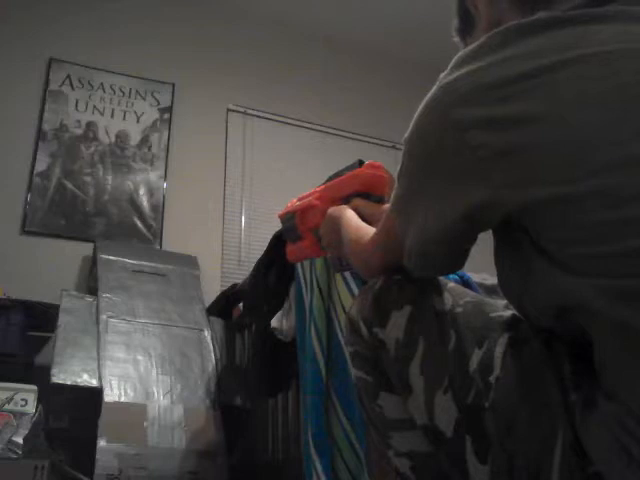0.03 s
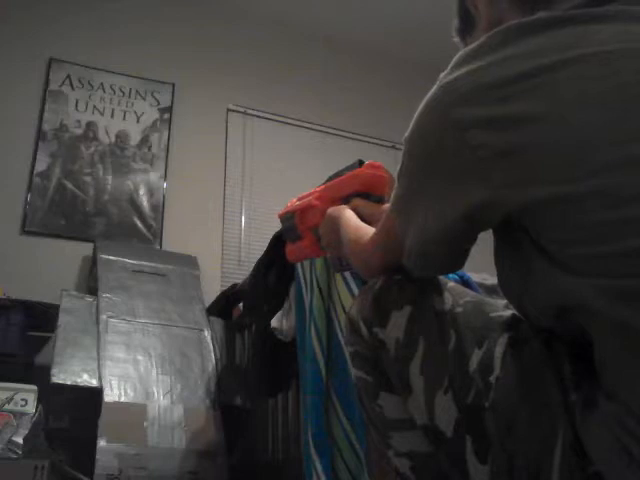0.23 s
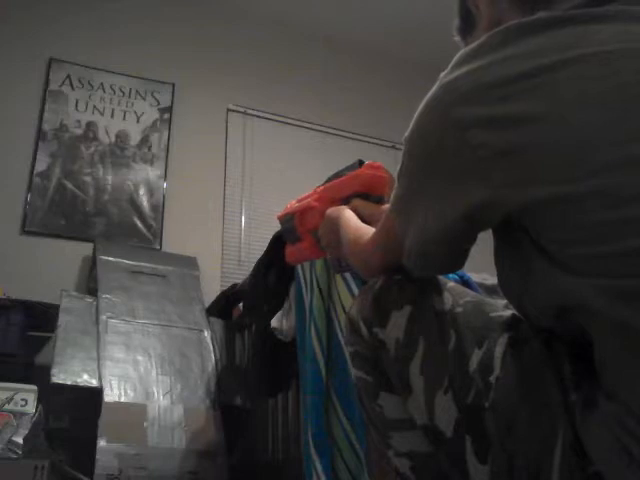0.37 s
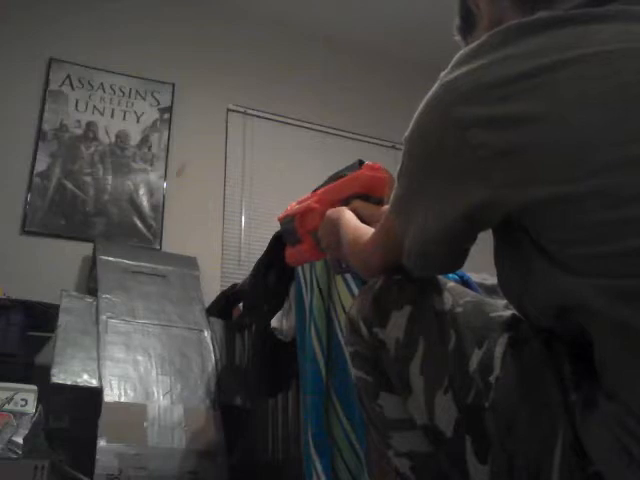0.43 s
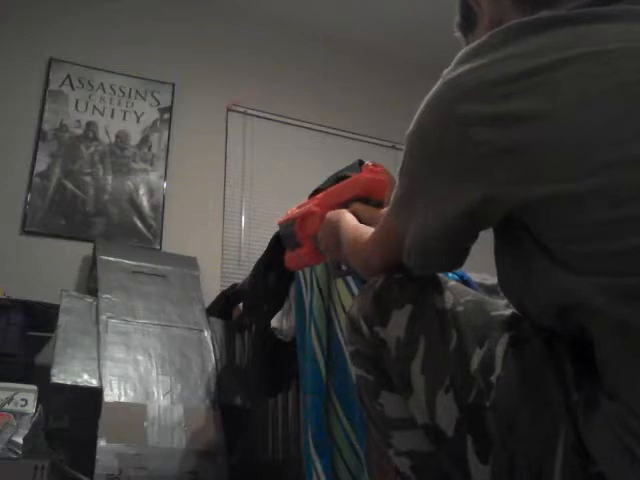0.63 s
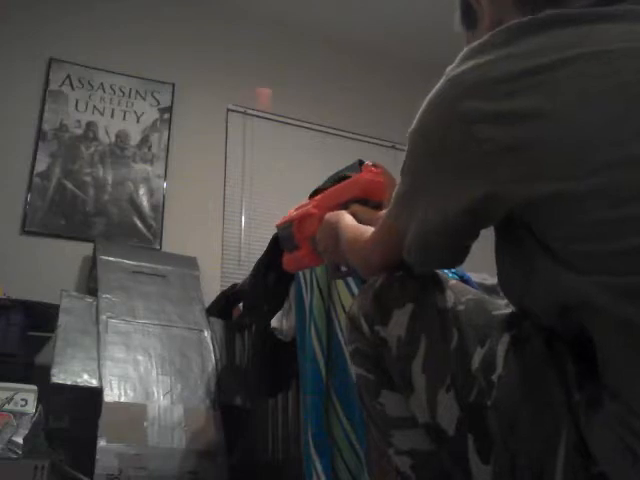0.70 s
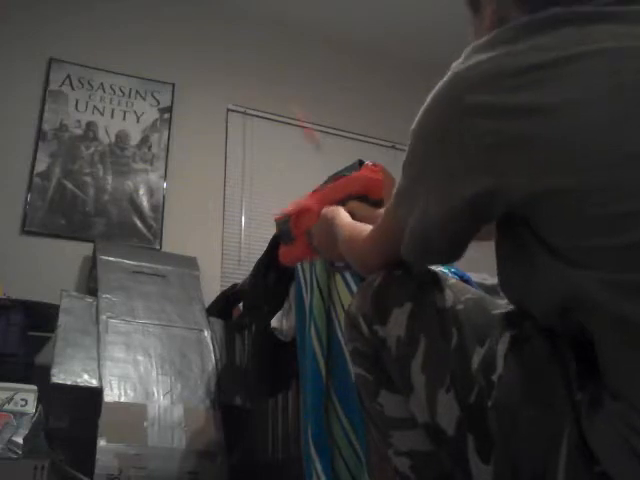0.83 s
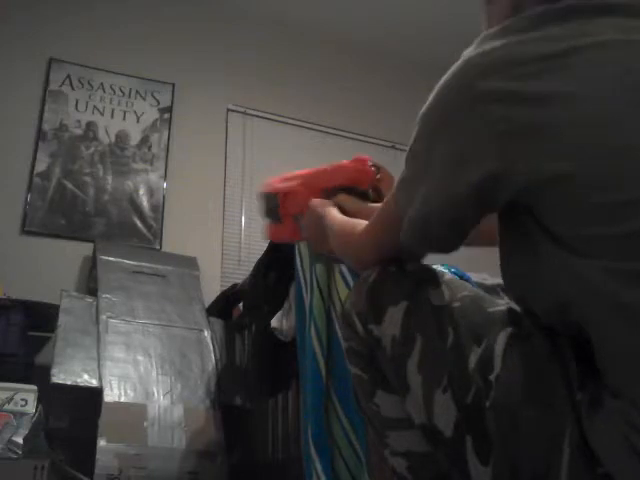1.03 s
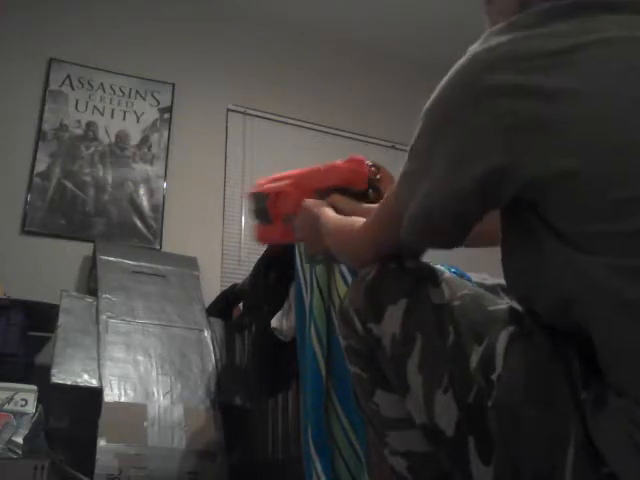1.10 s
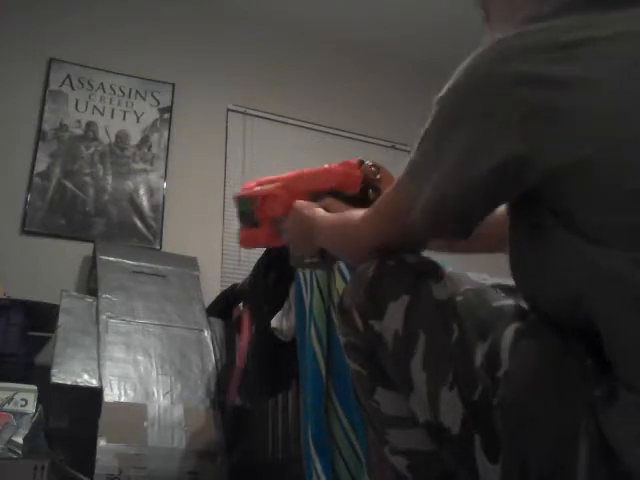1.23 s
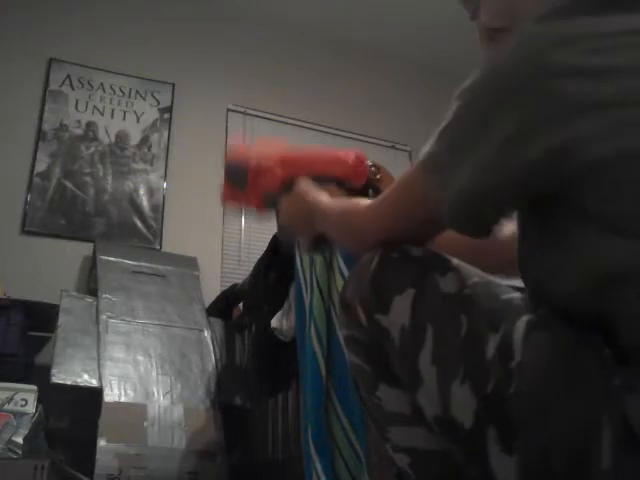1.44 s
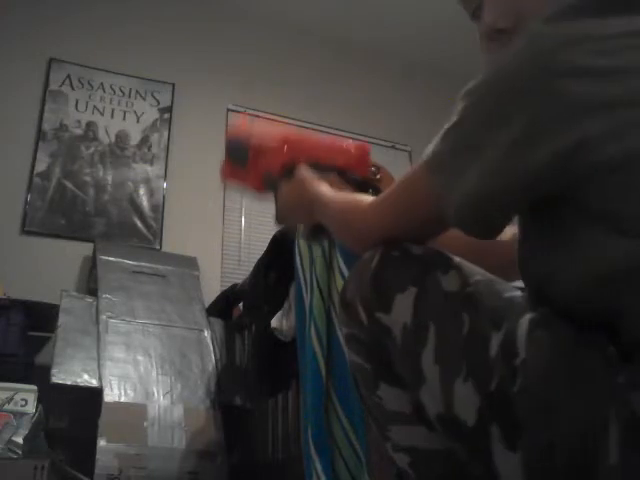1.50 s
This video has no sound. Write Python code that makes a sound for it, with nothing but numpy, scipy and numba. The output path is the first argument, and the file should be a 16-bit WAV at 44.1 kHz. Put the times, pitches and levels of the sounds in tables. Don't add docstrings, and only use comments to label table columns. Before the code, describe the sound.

Toy dart gun shot: small plastic creaks, one hard clipped snap, short room tail, soft knocks after.

```python
import sys
import numpy as np
from scipy import signal
from scipy.fft import rfft, irfft, next_fast_len
from scipy.io import wavfile
from scipy.ndimage import uniform_filter1d
from numba import njit

SR = 44100
rng = np.random.default_rng(int(sys.argv[2]) if len(sys.argv) > 2 else 0)


def transcribe(u):
    v = np.clip(np.atleast_2d(u).T, -1, 1)
    q = np.round(v * 32767).astype(np.int16)
    wavfile.write(sys.argv[1], SR, q)


def volts(x):
    e = np.asarray(x, float) / 20
    return 10 ** e


N = 68355
TAIL = 24000
NEAR_DECAY = 0.63

# [f/Hz, level/dB]
HISS = [(30, -46.5), (135, -21), (210, -6), (674, -18.5), (728, -18.5), (3190, -28), (14800, -27.5),
        (16000, -69)]
# [t/s, level/dB, contact/ms, tilt/(dB/octave), room/dB]
HANDLING = [(.0293, -51.5, 5.9, 1.5, -4.5), (.04, -52, 6.2, -4.5, -13), (.047, -41.5, 4.66, 1, -13.5),
            (.051, -36.5, 4, -2, -12.5), (.069, -35, 5, -2.5, -12), (.0892, -31, 8.1, -1, -7),
            (.104, -53, 4, -13, -12), (.116, -39, 5, 1, -9), (.13, -41, 4, -1.5, -10),
            (.193, -26.5, 6, -3.5, 0), (.755, -62.5, 2.66, -6.5, 4.5), (.856, -54, 2, -4, -25),
            (.861, -45.5, 6.3, 0, -0.5), (.8688, -31, 5.6, -0.5, -15.5), (.8755, -37.5, 7.7, -2, -13),
            (.884, -33, 4.9, -4, -22), (.891, -39, 5.8, 5.5, -16), (.897, -31, 2.5, -5, -15),
            (.906, -36.5, 2.1, -2, -14.5), (.911, -49, 6.6, 1.5, -15.5), (.922, -51, 2.65, -2, -23),
            (1.03, -66, 4, -10, -32.5), (1.278, -55.5, 7.8, 1, -8), (1.295, -58, 5.3, -5, -8),
            (1.343, -54.5, 8.7, -3, -0.5), (1.3608, -45.5, 2.3, -0.5, -11), (1.373, -50, 3, 5.5, -25),
            (1.377, -52, 2, -10, -8), (1.384, -49, 4.4, 5, -10), (1.3957, -55, 4.5, -2, -10),
            (1.411, -54.5, 4.5, 2, -7), (1.426, -59.5, 3, 5, -12), (1.483, -49.5, 4.8, -4, -13)]
# [t/s, level/dB, contact/ms, tilt/(dB/octave), room/dB]
SHOT_HITS = [(.2005, -9, 3, 2, -12.5), (.2035, -1.5, 3.6, 0.5, -9), (.2075, -6, 3, 0, -16),
             (.2106, 6, 7, -1, -17.5), (.2165, 7.5, 3.8, -4, -19.5), (.236, -8, 5, 0, -8),
             (.246, -9, 3, 1, -10), (.257, -4.5, 9, -0.5, -7), (.266, -5.5, 2, -1.5, -13.5),
             (.273, -11, 4, -1, -14), (.284, -7.5, 5.6, 1, -8), (.298, -6.5, 4, -3.5, -7),
             (.319, -5.5, 5.3, -1, -6.5), (.334, -8.5, 6, 0, -8.5)]
# [f/Hz, level/dB]
PLASTIC_COLOUR = [(88, -60), (150, -30), (443, -12), (711, -12.5), (1610, -7.5), (2790, -9), (4160, -7.5),
                  (8070, -25.5), (14000, -62)]
# [f/Hz, level/dB]
BODY_COLOUR = [(180, -26), (650, -17), (960, -8), (2100, -13.5), (3400, -4), (4400, -2.5), (6300, -21),
               (13000, -49)]
# [t/s, level/dB, contact/ms, room/dB]
DART_HITS = [
    (.2876, 7, 2.2, -10.5),
    (.2945, 2, 0.74, -7),
    (.2995, 2, 0.92, -5),
    (.3115, 3, 1.64, -14),
    (.319, 6, 0.37, -10),
    (.3245, 5, 0.68, -12),
    (.3285, 6.5, 1.04, -9),
    (.3375, -1.5, 0.51, -10),
    (.3445, 7, 0.8, -9),
    (.36, -0.5, 0.9, -7.5),
]
# [f/Hz, level/dB, t60/s]
BOX_MODES = [(124.4, -6.5, 0.063), (223.3, -12.5, 0.024), (290, -4.5, 0.049), (426, 4.5, 0.034),
             (528.5, 11.5, 0.014), (644, -4, 0.019), (762, 2, 0.02), (904, 0, 0.0067), (1297, -8, 0.03),
             (1550, -8, 0.031)]
# [t/s, level/dB, contact/ms, room/dB]
FRAME_KNOCKS = [
    (1.3612, -13.5, 1.26, -20.5),
    (1.3708, -14, 0.97, -24),
    (1.3794, -24, 1.216, -28),
    (1.3887, -22.5, 0.66, -27.5),
    (1.4037, -20.5, 0.71, -20.5),
    (1.4228, -28, 0.91, -33),
    (1.442, -33.5, 1, -12),
]
# [f/Hz, level/dB, t60/s]
FRAME_MODES = [(170, -27.5, 0.044), (231, -12, 0.056), (274, 4, 0.057), (323.5, 6.5, 0.04),
               (390.6, -7, 0.025), (606, -16, 0.057), (846, -13.5, 0.025)]
# [f/Hz, level/dB, t60/s]
RING_MODES = [
    (1284, -40.5, 1.7),
    (1263, -45, 1.5),
    (926, -6, 0.18),
    (987, -7, 0.13),
]
# [f/Hz, level/dB, t60/s, room/dB]
TINK_MODES = [(1890, -38.5, 0.032, -30), (2700, -42.5, .015, -19), (690, -33, .04, -7.5),
              (5050, -34, 0.025, -14), (847, -10, .06, -6), (1800, -49, 0.039, -7.5),
              (1243, -49.5, 0.084, -16.5), (4340, -21, 0.01, -30), (1276, -30.5, 0.027, -7),
              (1900, -26.5, 0.021, -5), (1650, -40.5, 0.014, -11.5), (2253, -39.5, 0.0181, -10.5),
              (1110, -62, 0.0094, -12), (1068, -23.5, 0.0073, -8), (2134, -39, 0.016, -19),
              (2360, -42, 0.019, -7), (4200, -38, 0.016, -13), (2254, -46, .015, -12),
              (2293, -48, .015, -3), (284, -16.5, .04, -14), (3240, -5, 0.033, -11.5),
              (912, -19.5, 0.013, -8.5), (3300, -27.5, .012, -21.5), (3750, -42, 0.011, -21.5),
              (415, -13, 0.21, -30.5), (960, -5, .04, -12.5), (980, -4, .06, -16), (3400, -34, 0.032, -12),
              (1280, -36, .02, -13.5), (4880, -19.5, 0.019, -5.5), (8300, -13, .025, -30),
              (2200, -8, .03, -12), (760, -35, .04, -10)]
TINK_TIMES = (.0505, .051, .0905, .0905, .236, .769, .775, .8697, .8697, .897, .911, 1.3605, 1.3605, 1.374,
              1.376, 1.389, 1.396, 1.4, 1.41, .2108, .213, .533, .0905, 1.3608, .345, .244, .256, .891, .88,
              .5325, .213, .204, .103)
# [t/s, level/dB, contact/ms, tilt/(dB/octave), room/dB]
FLOOR_BOUNCES = [
    (.5318, -17.5, 5.1, 0, -10),
    (.545, -24, 6.3, -1, -17),
    (.557, -26, 4.7, -2, -17),
    (.574, -34.5, 4, 0.5, -15),
    (.615, -33, 4, -0.5, -11),
    (.7677, -42, 4, 0, -10),
]
# [f/Hz, level/dB]
TIP_COLOUR = [(150, -49), (300, -18), (800, -11.5), (1600, -8), (2800, -8.5), (4400, -2.5), (6000, -13.5),
              (8500, -26.5), (14000, -45.5)]


def unit(x):
    return x / np.sqrt(np.mean(x ** 2))


def filtered(x, order, hz, kind="low"):
    return signal.sosfilt(signal.butter(order, hz, kind, fs=SR, output="sos"), x)


def colour(x, table, tilt_db=0.):
    size = next_fast_len(len(x) + 4096)
    log_hz = np.log(np.maximum(np.arange(size // 2 + 1) * SR / size, 10))
    hz, level_db = np.array(table, float).T
    db = np.interp(log_hz, np.log(hz), level_db) + tilt_db * (log_hz - np.log(2000)) / np.log(2)
    cepstrum = irfft(db * np.log(10) / 20, size)
    cepstrum[1:size // 2] *= 2
    cepstrum[size // 2 + 1:] = 0
    response = np.exp(rfft(cepstrum))
    response = unit(np.abs(response)) * np.exp(1j * np.angle(response))
    return irfft(rfft(x, size) * response, size)[:len(x)]


def modes(table, t):
    return sum(volts(db) * np.sin(2 * np.pi * hz * t) * volts(-60 * t / t60) for hz, db, t60 in table)


def add(out, x, s):
    i = int(s * SR)
    out[i:i + len(x)] += x[:N - i]


def room(share=1.):
    build_s, hold_s = 0.0035, 0.015
    t60_s = 0.32, 0.31, 0.26
    t = np.arange(TAIL) / SR
    clumps_db = 3 * unit(uniform_filter1d(rng.standard_normal(TAIL), size=90))
    echoes = rng.standard_normal(TAIL) * volts(clumps_db)
    below_1k = filtered(echoes, 2, 1000)
    below_5k5 = filtered(echoes, 2, 5500)
    bands = below_1k, below_5k5 - below_1k, echoes - below_5k5
    late = np.maximum(t - hold_s, 0) / share
    fading = sum(band * volts(-60 * late / t60) for band, t60 in zip(bands, t60_s))
    return fading * (1 - np.exp(-(t / build_s) ** 2))


def clicks(table, spectrum, share=1.):
    rise_s, bright_db = 0.00042, -3.5
    out, t = np.zeros(N), np.arange(TAIL) / SR
    for s, db, ms, tilt_db, room_db in table:
        shape = (1 - np.exp(-t / rise_s)) * np.exp(-(t * 1000 / ms) ** 2)
        burst = rng.standard_normal(TAIL) * shape
        burst = burst + volts(bright_db) * filtered(burst, 2, 8000, "high")
        in_room = burst + volts(room_db) * room(share)
        add(out, volts(db) * colour(in_room, spectrum, tilt_db), s)
    return out


def thuds(table, body, build_s, share=1.):
    t = np.arange(6000) / SR
    out, ring = np.zeros(N), modes(body, t) * (1 - np.exp(-t / build_s))
    for s, db, ms, room_db in table:
        push = np.sin(np.pi * np.clip(np.arange(200) / SR * 1000 / ms, 0, 1)) ** 2
        blow = np.convolve(ring, np.diff(push))
        blow = blow / np.abs(blow).max()
        wet = 0.057 * signal.fftconvolve(blow, room(share))
        add(out, volts(db) * (np.pad(blow, (0, TAIL - 1)) + volts(room_db) * wet), s)
    return out


def hiss():
    return volts(-61) * unit(colour(rng.standard_normal(N), HISS))


def handling():
    return clicks(HANDLING, PLASTIC_COLOUR, NEAR_DECAY)


def frame_knocks():
    return thuds(FRAME_KNOCKS, FRAME_MODES, 0.0022, 0.59)


def floor_bounces():
    return clicks(FLOOR_BOUNCES, TIP_COLOUR)


def tinks():
    out, t = np.zeros(N), np.arange(6000) / SR
    for s, (hz, db, t60, room_db) in zip(TINK_TIMES, TINK_MODES):
        ring = modes([(hz, db, t60)], t) * (1 - np.exp(-t / 0.00033))
        wet = 0.039 * signal.fftconvolve(ring, room(NEAR_DECAY))
        add(out, np.pad(ring, (0, TAIL - 1)) + volts(room_db) * wet, s)
    return out


def box_thuds():
    return thuds(DART_HITS, BOX_MODES, 0.00054, 0.82)


def rings():
    slap_s, damped_s = .2108, 0.733
    out, t = np.zeros(N), np.arange(N) / SR
    waver = volts(1.8 * unit(uniform_filter1d(rng.standard_normal(N), size=500)))
    add(out, modes(RING_MODES, t) * waver, slap_s)
    return out * volts(-600 * np.maximum(t - damped_s, 0))


def shot():
    return clicks(SHOT_HITS, BODY_COLOUR, 1.344)


def scene():
    quiet = handling() + frame_knocks() + floor_bounces() + tinks()
    return (quiet + box_thuds() + rings() + shot())[None]


@njit
def follow(x, attack, release):
    e, out = 1e-6, np.empty(len(x))
    for i in range(len(x)):
        a = abs(x[i])
        e += (a - e) * (attack if a > e else release)
        out[i] = e
    return out


def microphone(x):
    peak_hz, width_hz, peak_db, low_hz = 4240, 520, -7.5, 157
    x = x + volts(peak_db) * signal.lfilter(*signal.iirpeak(peak_hz, peak_hz / width_hz, fs=SR), x)
    return filtered(x, 3, low_hz, "high")


def gain_control(x):
    top_db, ratio, attack_s, release_s = -11.5, 3.6, 0.01, 0.19
    level = follow(x, 1 / (attack_s * SR), 1 / (release_s * SR))
    return x * np.minimum(volts(top_db) / level, 1) ** (1 - 1 / ratio)


def soft_gate(x):
    at_db, depth_db, soft_db, treble_hz, treble_db = -55, -7, 4, 2500, -6
    attack_s, release_s = 0.000979, .036
    loud_db = 20 * np.log10(follow(x, 1 / (attack_s * SR), 1 / (release_s * SR)))
    shut = (1 - np.tanh((loud_db - at_db) / soft_db)) / 2
    dull = filtered(x, 1, treble_hz)
    return volts(depth_db * shut) * (dull + volts(treble_db * shut) * (x - dull))


def mask(x):
    mask_hz, mask_db, jump_db, loud_enough_db = 7900, -25, 5, -31
    hz, _, z = signal.stft(x, SR, nperseg=2048, noverlap=1792)
    power = np.abs(z) ** 2
    presence = power[(hz > 2000) & (hz < 6000)]
    loud = presence.sum(axis=0)
    attack = (loud > volts(2 * jump_db) * np.roll(loud, 5)) & (loud > volts(2 * loud_enough_db))
    uneven_db = 3 * np.repeat(rng.standard_normal(len(hz) // 12 + 1), 12)[:len(hz), None]
    weak = power < volts(2 * (mask_db + uneven_db)) * presence.mean(axis=0)
    hidden = weak & (hz > mask_hz)[:, None] & ~attack
    return signal.istft(z * ~hidden, SR, nperseg=2048, noverlap=1792)[1][:N]


def top_cut(x):
    return signal.sosfilt(signal.butter(12, 14900, fs=SR, output="sos"), x)


def record(dry):
    x = microphone(dry[0]) / 1.317 + hiss()
    x = soft_gate(gain_control(x))
    mix = mask(np.clip(x, -1, 1))[None]
    return top_cut(mix)


dry = scene()
out = record(dry)
transcribe(out)
```